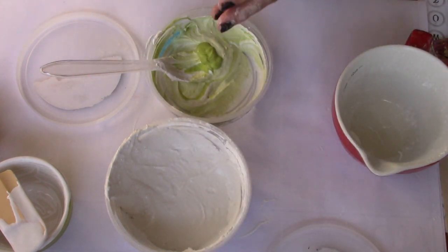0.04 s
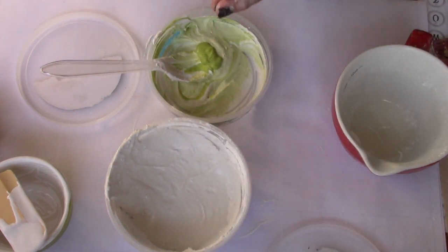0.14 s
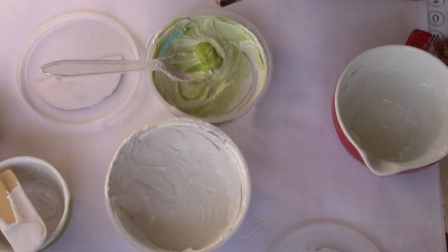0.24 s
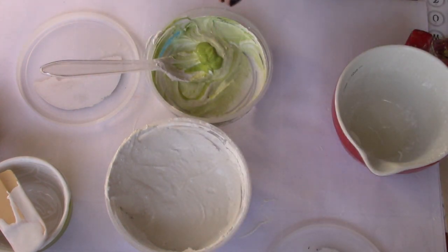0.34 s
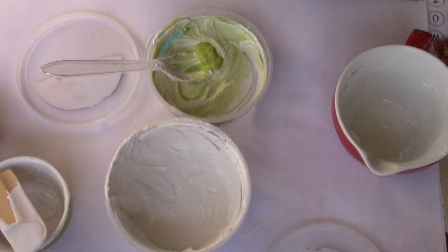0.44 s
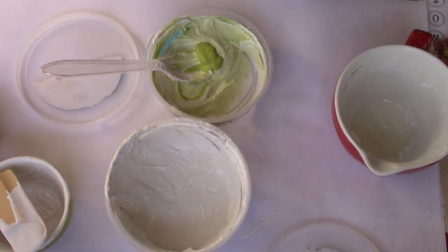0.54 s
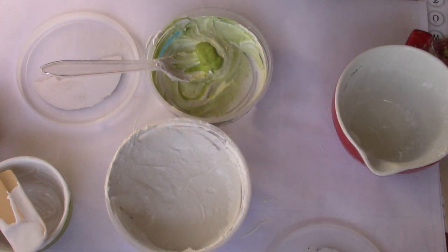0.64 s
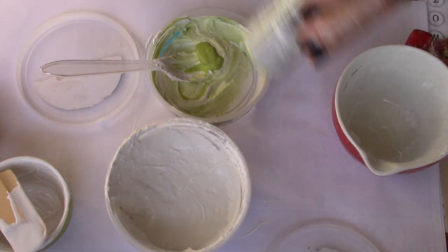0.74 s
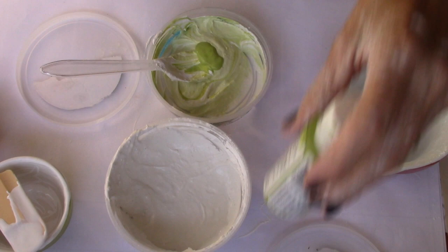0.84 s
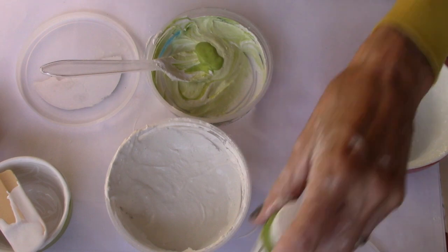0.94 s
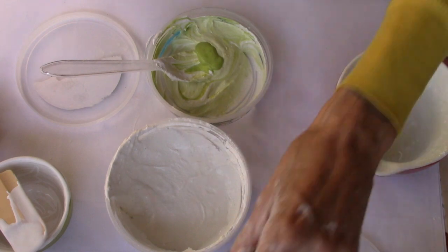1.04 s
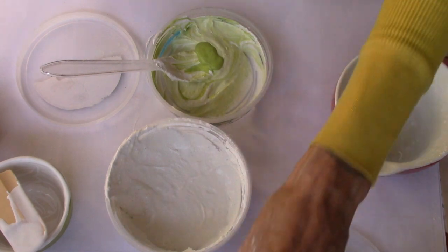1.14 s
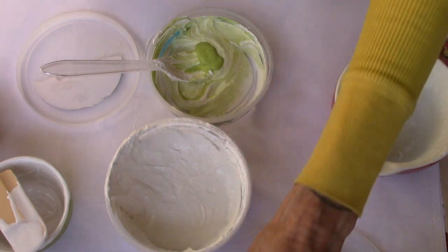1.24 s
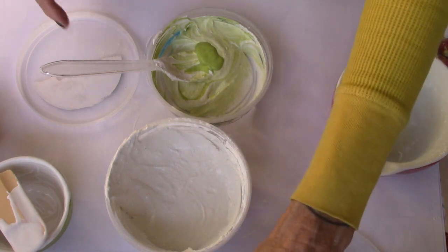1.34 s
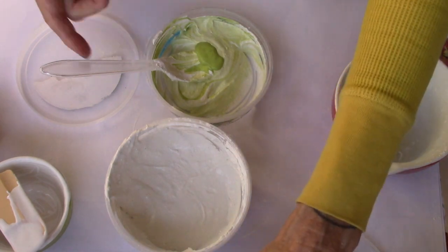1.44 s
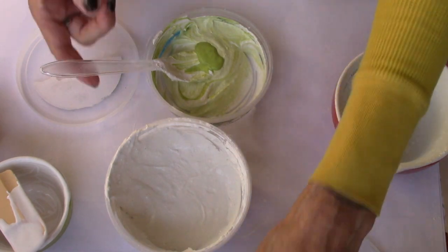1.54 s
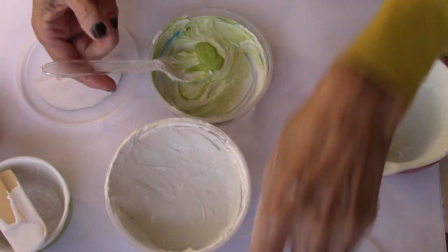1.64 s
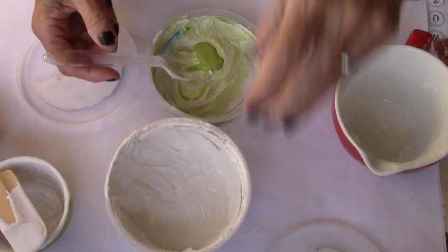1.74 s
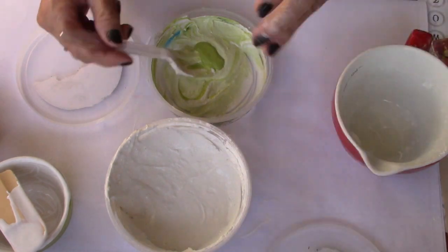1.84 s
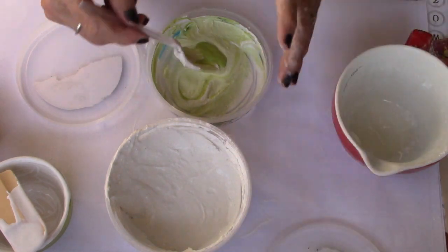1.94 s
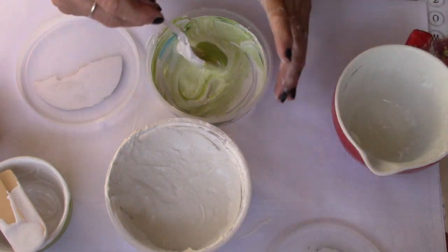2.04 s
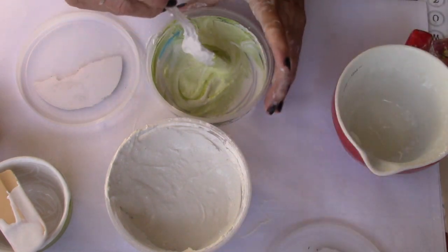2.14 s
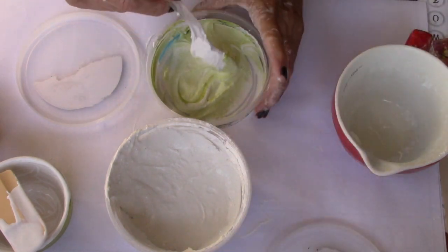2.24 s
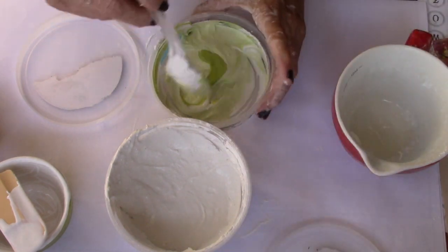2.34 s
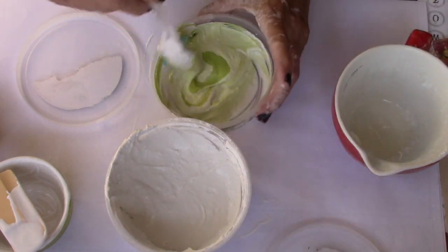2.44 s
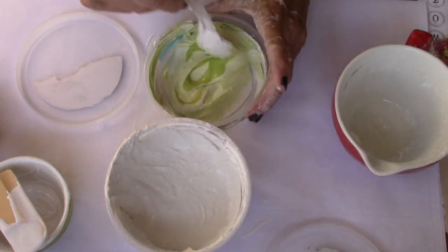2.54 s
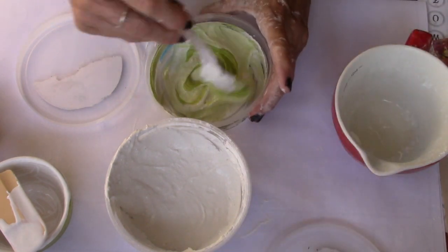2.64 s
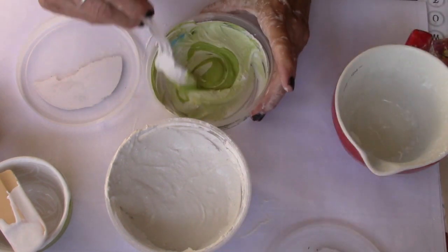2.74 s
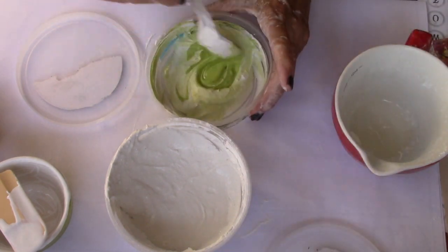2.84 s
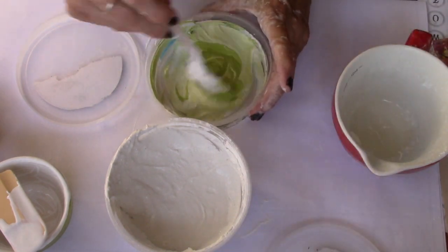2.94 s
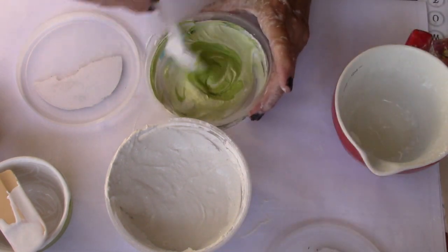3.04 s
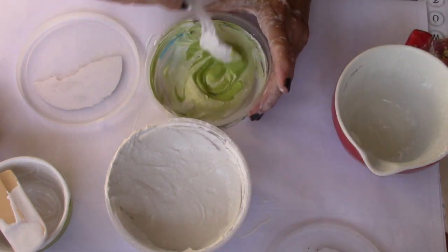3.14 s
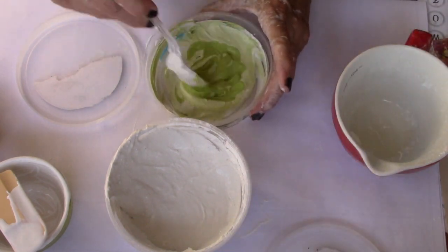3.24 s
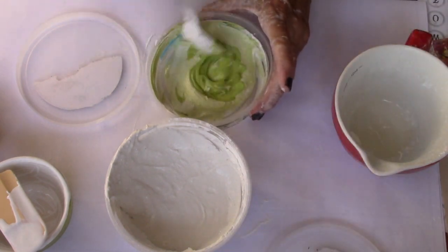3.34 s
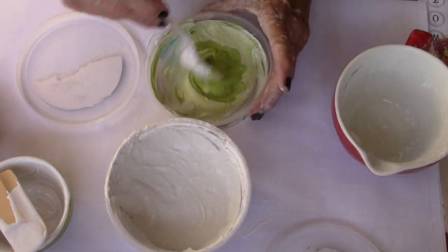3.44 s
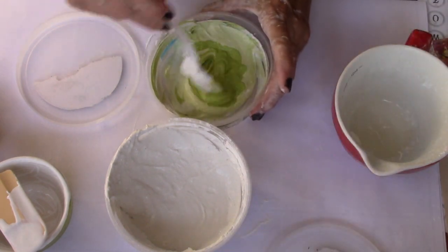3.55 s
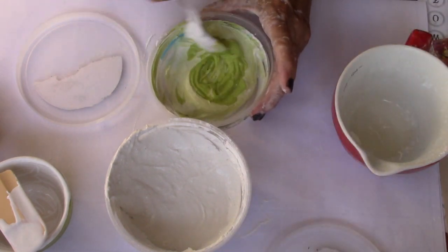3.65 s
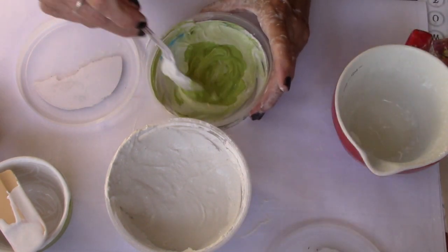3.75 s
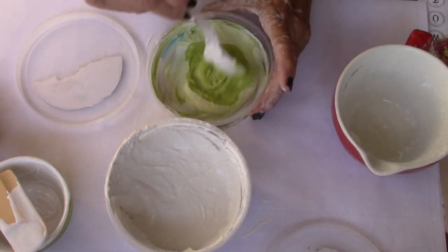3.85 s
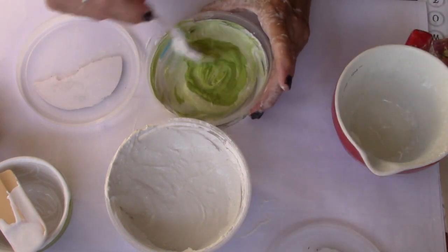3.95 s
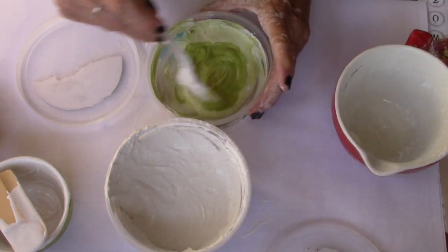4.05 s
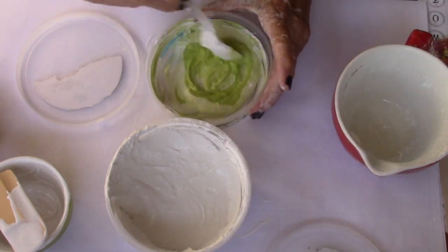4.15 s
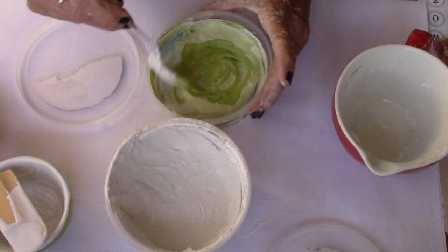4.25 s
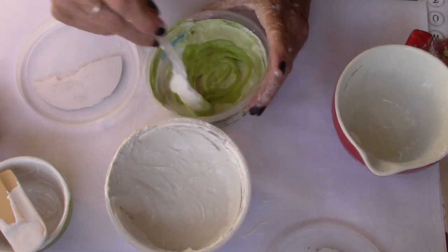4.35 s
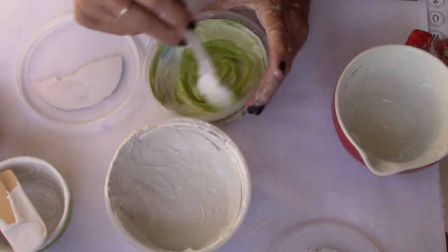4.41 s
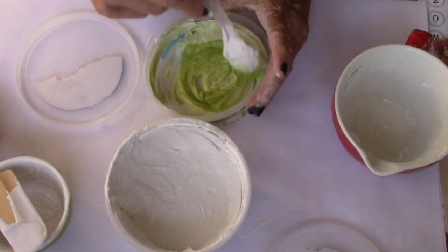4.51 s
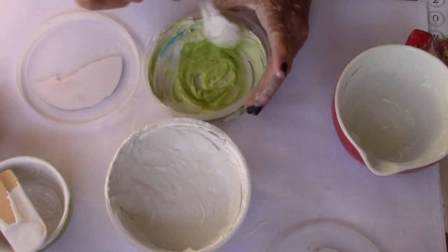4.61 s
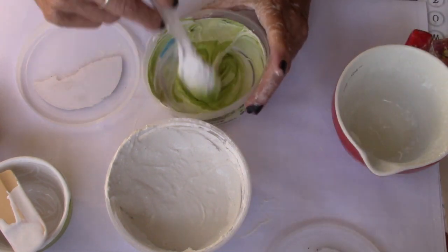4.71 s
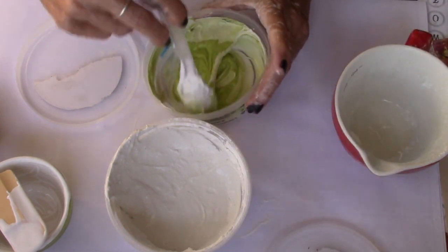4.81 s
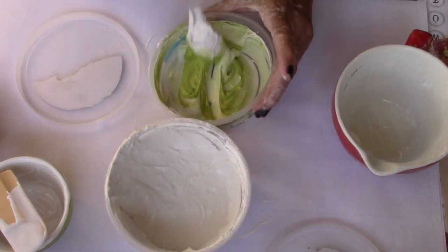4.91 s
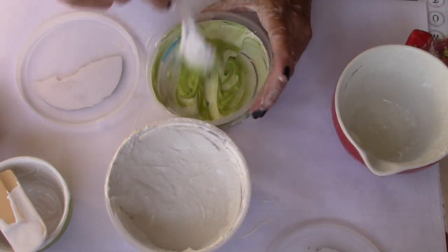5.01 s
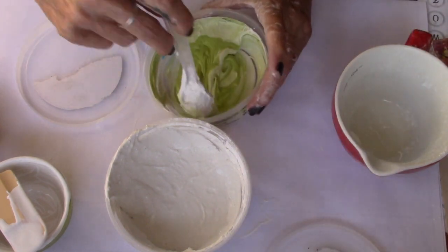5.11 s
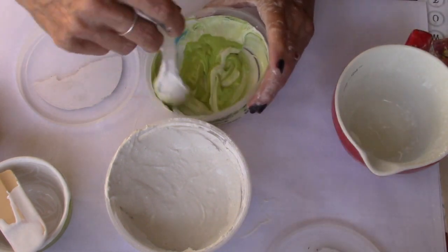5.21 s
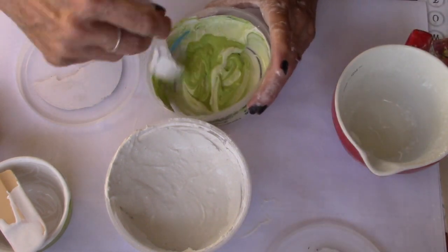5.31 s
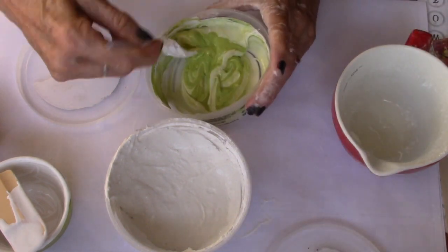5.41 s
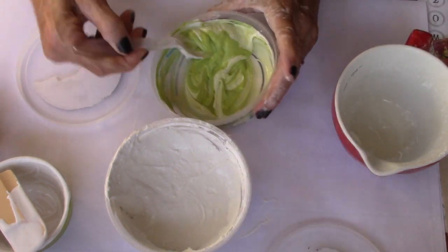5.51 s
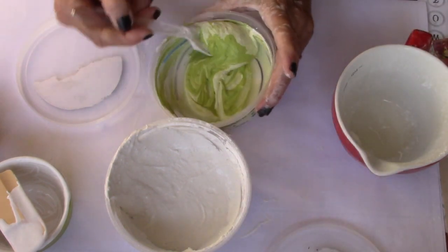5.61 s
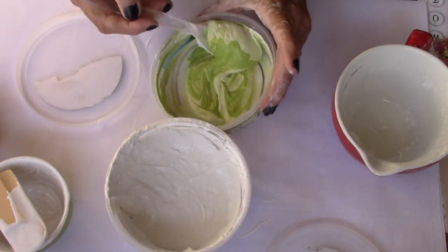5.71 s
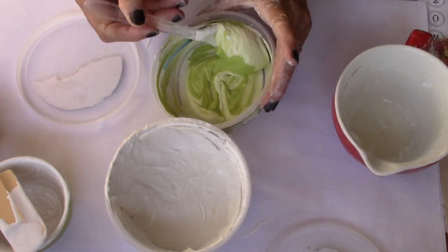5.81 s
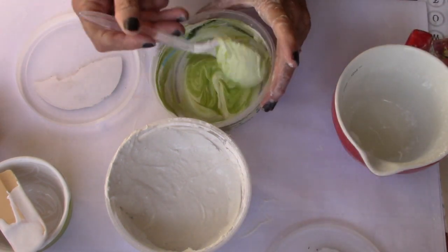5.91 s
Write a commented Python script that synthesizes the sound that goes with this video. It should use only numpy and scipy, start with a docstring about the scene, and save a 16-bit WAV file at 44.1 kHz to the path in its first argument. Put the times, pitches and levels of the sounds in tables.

```python
"""Stirring thick paste on a hollow table

A bottle is handled, then set down with a loud knock; later a plastic spoon stirs paste in a small plastic tub.
Strokes and rumbling arms are friction noise through resonances and filters; knocks, ticks and blows are
decaying modes with noise bursts. The sounds on the table get a short stereo reverberation, over a quiet room tone.
"""
import sys
import numpy as np
from scipy import signal
from scipy.fft import rfft, irfft, next_fast_len
from scipy.io import wavfile
from scipy.ndimage import uniform_filter1d, map_coordinates

SR = 44100
rng = np.random.default_rng(int(sys.argv[2]) if len(sys.argv) > 2 else 0)


def log_audio(samples):
    """Write samples as a 16-bit WAV file to the path given in sys.argv[1]."""
    # one column per channel
    frames = np.atleast_2d(samples).T
    # limit to full scale, then quantise
    limited = np.clip(frames, -1, 1)
    pcm = np.round(limited * 32767).astype(np.int16)
    wavfile.write(sys.argv[1], SR, pcm)


N = 263347  # length in samples


def amp(db):
    """Gain of a level in dB."""
    return 10 ** (np.asarray(db) / 20)


def unit(x):
    """Scaled to rms 1."""
    return x / np.sqrt(np.mean(x ** 2) + 1e-20)


def along(points, hz):
    """Reads a curve of (Hz, value) points on a log frequency axis."""
    f, v = np.transpose(points)
    return np.interp(np.log(hz + 1), np.log(f + 1), v)


def curves(rows):
    """One value per sample for each column after the time."""
    s, *cols = np.transpose(rows)
    return [np.interp(np.arange(N) / SR, s, c) for c in cols]


def wobble(rate):
    """A smooth random curve, rate knots a second."""
    knots = rng.standard_normal(int(N * rate / SR) + 4)
    return map_coordinates(knots, [np.arange(N) * rate / SR])


def filtered(x, response):
    """Multiplies the spectrum of x by a response of frequency."""
    m = next_fast_len(N + SR // 2)
    spectrum = rfft(x, m) * response(np.fft.rfftfreq(m, 1 / SR))
    return irfft(spectrum, m)[..., :N]


def shaped(x, points):
    """Colours x with an equalizer curve of (Hz, dB) points."""
    return filtered(x, lambda hz: amp(along(points, hz)))


def ringing(modes, seconds, spread_db=0, opposite=True):
    """Decaying sines of (Hz, dB, t60 s), neighbours in opposite phase or all in step, largest swing 1."""
    t = np.arange(round(seconds * SR)) / SR
    ring = np.zeros(len(t))
    for k, (hz, db, t60) in enumerate(modes):
        sign = (-1) ** (k * opposite)
        decay = amp(db + spread_db * rng.standard_normal() - 60 * t / t60)
        ring += sign * decay * np.sin(2 * np.pi * hz * t)
    ring *= 1 - np.exp(-t / 0.00014)  # no contact is instant
    return ring / np.abs(ring).max()


def add(track, s, sound):
    """Mixes a sound in at s seconds."""
    part = track[round(s * SR):][:len(sound)]
    part += sound[:len(part)]


def grit(grain_db, clump_db):
    """Friction noise: tiny slips of uneven size, in clumps."""
    sizes = amp(grain_db * wobble(900) + clump_db * wobble(70))
    return unit(sizes * rng.standard_normal(N))


def patchy(x, depth_db):
    """Narrow bands come and go, as small parts of the plastic ring for a moment."""
    z = signal.stft(x, nperseg=256)[2]
    across_bands = uniform_filter1d(rng.standard_normal(z.shape), size=3, axis=0)
    field = uniform_filter1d(across_bands, size=12, axis=1)
    return unit(signal.istft(z * amp(depth_db * unit(field)), nperseg=256)[1][:N])


# colour of the air noise: pitch_hz, density_db [relative, per Hz]
AIR_COLOUR = [(12, -48), (20, -17), (60, -8), (123, -4.5), (177, 1.5), (270, 3), (849, -3), (1000, -3),
              (1860, -13), (5680, -23), (11400, -21), (14700, -28.5), (16000, -31)]
# likeness of left and right noise: pitch_hz, likeness [1 = the same]
STEREO_LIKENESS = [(60, 0.11), (180, 0.52), (550, 0.38), (1650, 0.31), (4970, 1), (15000, 1.0)]


def room_tone():
    """Air noise with a slightly drifting level, partly different at the two microphones."""
    def mid_side_gains(hz):
        turn = np.arccos(np.clip(along(STEREO_LIKENESS, hz), -1, 1)) / 2
        return amp(along(AIR_COLOUR, hz)) * [np.cos(turn), np.sin(turn)]

    mid, side = filtered(rng.standard_normal((2, N)), mid_side_gains)
    level_db = -60 + 0.3 * wobble(3.8)
    return amp(level_db) * unit(np.array([mid + side, mid - side]))


# sleeves and hands on the table, levels gliding between rows: time_s, rumble_db, cloth_db
ARM_LEVELS = [(0.0, -66.5, -65), (1.63, -56.5, -61.5), (2.28, -63, -62), (4.34, -65, -64.5),
              (5.62, -64, -58), (5.97, -68, -61)]
# modes of the hollow table top: pitch_hz, level_db [relative], t60_s
TOP_MODES = [(177, -34.5, 0.25), (198.8, -17, 0.255), (255.2, -12, 0.2), (319, -6, 0.16),
             (372.4, -5.5, 0.09), (402, -5.5, 0.1), (489, -11, 0.2), (546.5, -9.5, 0.21),
             (583.6, -13, 0.19), (674, -12, 0.16), (721, -14, 0.1), (753.4, -14.5, 0.2), (832, -22, 0.098),
             (888, -28.5, 0.25)]
# lowest bending of the top: pitch_hz, t60_s
BOOM_HZ, BOOM_T60_S = (118, 0.3)
# colour of the dull rustle on the top: pitch_hz, density_db [relative, per Hz]
CLOTH_COLOUR = [(500, -9), (1200, 5), (3000, -2.5), (6500, -8.5), (8500, -16), (11000, -66)]


def arms():
    """Sleeves drag on the top: friction makes its modes rumble and the cloth rustles."""
    rumble_db, cloth_db = curves(ARM_LEVELS)
    top = ringing(TOP_MODES + [(BOOM_HZ, -8, BOOM_T60_S)], seconds=.3)
    damped = top * amp(-60 * np.arange(len(top)) / SR / 0.11)  # the resting arms shorten the ring
    rumble = unit(signal.fftconvolve(grit(grain_db=1.5, clump_db=4.0), damped)[:N])
    cloth = unit(shaped(grit(grain_db=1.56, clump_db=1.7), CLOTH_COLOUR))
    return amp(rumble_db) * rumble + amp(cloth_db) * cloth


# rubs on plastic, first of fingers and bottle, from 2.1 s of the spoon:
#   most_pressure_s, scrape_db, length_ms [10 dB up and 10 dB down], edge_hiss_db, wall_ring_db, rim_ring_db
RUBS = [(0.004, -59.5, 42, -61.5, -78, -79), (0.161, -67, 52, -73, -53, -57.5),
        (0.394, -57.5, 135, -55.5, -86, -63), (0.47, -63, 64, -64, -77, -68),
        (0.605, -67, 32, -67, -66, -76), (0.665, -65, 52, -89, -61, -62), (0.72, -65, 180, -87, -68, -64.5),
        (1.088, -63, 110, -82, -59.5, -60.5), (1.409, -61, 83, -91, -87, -59),
        (1.98, -70, 190, -89, -69, -69.5), (2.19, -62, 55, -58.5, -82, -69),
        (2.224, -53.5, 85, -54, -50.5, -54), (2.339, -56.5, 123, -59, -57, -57.5),
        (2.421, -55, 64, -66, -73, -57), (2.486, -47.5, 106, -52.5, -49.5, -51.5),
        (2.66, -64.5, 81, -64, -59, -61), (2.715, -65, 88, -65, -69, -79), (2.81, -79, 67, -82, -60, -62),
        (2.851, -58, 52, -61.5, -61, -63), (2.936, -61.5, 38, -65, -57.5, -53),
        (3.059, -73, 84, -68, -80, -63), (3.101, -67, 55, -73, -75, -74),
        (3.189, -64.5, 145, -65.5, -65, -65.5), (3.35, -66, 124, -71, -76, -62),
        (3.467, -64, 79, -70, -64, -62.5), (3.58, -61, 89, -62.5, -64, -61),
        (3.747, -69, 230, -72, -82, -69), (3.849, -63.5, 72, -67, -66, -65),
        (3.967, -59.5, 86, -63.5, -60, -62.5), (4.093, -54.5, 63, -62.5, -71, -55),
        (4.349, -53, 47, -61, -45, -50), (4.472, -58, 107, -61.5, -76, -57.5),
        (4.612, -58.5, 130, -56.5, -55.5, -59.5), (4.86, -54.5, 98, -59.5, -48, -52),
        (4.975, -65, 73, -67, -68, -73), (5.108, -61.5, 130, -65, -57.5, -60.5),
        (5.21, -66, 85, -69, -55.5, -66), (5.304, -57.5, 108, -57, -66, -52.5),
        (5.374, -54, 26, -58, -78, -43), (5.44, -57, 50, -66, -61, -55),
        (5.526, -53.5, 94, -54, -47.5, -46.5), (5.574, -62, 120, -71, -55, -50.5),
        (5.721, -53, 130, -58.5, -55, -50), (5.78, -69, 94, -61.5, -54.5, -72),
        (5.85, -67, 130, -68, -65, -64)]
# the place that is rubbed sets the pitch, before scatter: time_s, wall_hz, rim_hz
RUBBED_PLACE = [(0.0, 1210, 3340), (0.4, 1180, 3470), (0.65, 1310, 2360), (1.09, 850, 3200),
                (1.4, 900, 2520), (2.2, 1094, 2910), (2.66, 1077, 2430), (4.1, 1050, 2590),
                (4.35, 1400, 1970), (4.55, 1140, 2600), (4.86, 1390, 2650), (5.44, 1220, 2680),
                (5.52, 1650, 2000), (5.58, 1250, 2520), (5.72, 1240, 2060), (5.8, 1060, 2100),
                (5.97, 1260, 2200)]
# colour of the scrape: pitch_hz, density_db [relative, per Hz]
SCRAPE_COLOUR = [(1000, -82), (2500, -4), (3500, 1), (4700, 4.5), (5700, 7), (7000, -3), (9000, -19),
                 (12000, -30)]
# colour of the edge hiss: pitch_hz, density_db [relative, per Hz]
EDGE_COLOUR = [(6000, -19), (8000, 0.5), (10500, 0.5), (12000, -2.5), (14000, -9), (16000, -13)]
RISE_SHARE = 0.41  # share of a stroke's length spent rising 10 dB
PITCH_SCATTER = .03  # relative; no two strokes touch quite the same place


def sing(slips, modes):
    """Slips keep short modes ringing, at rms 1."""
    return unit(signal.fftconvolve(slips, ringing(modes, seconds=.05))[:len(slips)])


def plastic_strokes():
    """Each stroke slips along plastic: it hisses, and wall and rim sing where they are touched."""
    slips = grit(grain_db=2, clump_db=1.8)
    scrape = patchy(shaped(slips, SCRAPE_COLOUR), depth_db=2.5)
    edge = patchy(shaped(slips, EDGE_COLOUR), depth_db=2.5)
    sound, t = np.zeros(N), np.arange(N) / SR
    walls_hz, rims_hz = curves(RUBBED_PLACE)
    scatter = 1 + PITCH_SCATTER * rng.standard_normal((len(RUBS), 2))
    for (s, db, ms, edge_db, wall_db, rim_db), (wall_off, rim_off) in zip(RUBS, scatter):
        rise, fall = max(ms, 10) / 1000 * np.array([RISE_SHARE, 1 - RISE_SHARE])
        span = slice(max(round((s - 3 * rise) * SR), 0), round((s + 3 * fall) * SR))
        peak = round(abs(s) * SR)
        wall_hz, rim_hz = wall_off * walls_hz[peak], rim_off * rims_hz[peak]
        wall = sing(slips[span], [(wall_hz, 0, .02), (wall_hz * 1.315, -1.5, .012), (wall_hz * 0.867, -4, .012)])
        rim = sing(slips[span], [(rim_hz, 0, .009), (rim_hz * 1.242, 0, .009), (rim_hz * 0.81, 0, .009)])
        away = np.where(t[span] < s, (s - t[span]) / rise, (t[span] - s) / fall)
        pressure = amp(-10 * away ** 1.33)
        hiss = amp(db) * scrape[span] + amp(edge_db) * edge[span]
        song = amp(wall_db) * wall + amp(rim_db) * rim
        sound[span] += pressure * (hiss + song)
    return sound


# knocks of tub and bottle: start_s, knock_db, pitch_hz, wall_ring_db
HOLLOW_KNOCKS = [(0.1527, -35.5, 369, -42), (0.2073, -52, 293, -54), (0.749, -54, 400, -47),
                 (1.581, -47, 485, -47.5), (2.4167, -32, 712, -49), (3.0927, -58, 361, -44.5),
                 (3.181, -50, 456, -45), (3.46, -65, 237, -45), (4.0036, -63, 662, -40.5),
                 (4.3425, -28.5, 272, -27.5), (4.405, -48, 273, -60), (4.789, -35.5, 390, -37),
                 (4.856, -40, 472, -49), (5.1433, -44.5, 368, -43.5), (5.1592, -44.5, 240, -48),
                 (5.2831, -41, 278, -39.5), (5.4487, -47.5, 280, -48)]
# modes of the tub wall: pitch_hz, level_db [relative, before random spread], t60_s
WALL_MODES = [(957, 4.5, 0.012), (1098, 8.5, 0.032), (1324, 2, 0.043), (1580, 5, 0.029)]


def knocks():
    """A hollow knock of three decaying modes against the table; the wall rings along."""
    sound = np.zeros(N)
    for s, db, hz, wall_db in HOLLOW_KNOCKS:
        hollow = ringing([(hz, 0, 22 / hz), (hz * 1.62, -6, .03), (hz * 2.36, -6, .015)], seconds=.2)
        add(sound, s, amp(db) * hollow)
        add(sound, s, amp(wall_db) * ringing(WALL_MODES, seconds=.1, spread_db=5.5))
    return sound


# ticks of spoon and bottle: start_s, click_db, pitch_hz, snap_db [before colouring]
SMALL_TICKS = [(0.1528, -31.5, 3410, -34.5), (0.3336, -44, 5900, -43), (0.648, -38, 2400, -46),
               (0.7918, -43, 3050, -44), (1.581, -43, 2600, -65), (2.1758, -47, 5680, -34),
               (2.4165, -30.5, 2380, -53), (2.4954, -33.5, 3050, -32), (2.6593, -41, 2270, -48),
               (2.9153, -46, 2500, -51), (2.9855, -56, 3220, -39), (3.0926, -45, 2640, -41),
               (3.1818, -43, 2560, -54), (3.3388, -41.5, 2490, -44), (3.3606, -43, 2650, -29),
               (3.46, -31, 4850, -35.5), (3.9693, -33, 4950, -50), (4.0036, -47, 2900, -58),
               (4.057, -32, 2700, -37), (4.0747, -43, 5000, -50), (4.1064, -49, 4940, -42),
               (4.1162, -37, 4600, -45), (4.1698, -64, 2340, -40.5), (4.329, -42, 4280, -37),
               (4.3425, -34, 2150, -50), (4.554, -46, 2230, -47), (4.789, -38, 2700, -45),
               (4.8065, -44, 2680, -36), (4.8421, -49, 2760, -40), (4.8904, -39, 5810, -23.5),
               (5.1592, -46, 2500, -36), (5.2836, -42, 2840, -52), (5.2948, -38, 2400, -45),
               (5.3722, -36, 2120, -35), (5.4494, -40, 2880, -33.5), (5.5178, -31, 2410, -16)]
# colour of the bright part of a tick: pitch_hz, gain_db
SNAP_COLOUR = [(1500, -17), (4000, -5.5), (8000, -1.5), (10500, -1), (13500, -4), (16000, -13)]
TICK_WALL_DB = -11.5  # ring of the tub wall, relative to the click


def ticks():
    """Each small contact: a short pitched click, a bright noise snap and a ring of the wall."""
    sound, snaps, t = np.zeros(N), np.zeros(N), np.arange(SR // 50) / SR
    snap_decay = amp(-60 * t / 0.0016) + amp(-12 - 60 * t / 0.021)  # sharp start, softer tail
    for s, db, hz, snap_db in SMALL_TICKS:
        modes = [(hz, 0, .009), (hz * 1.45, -3, .004), (hz * 0.7, -6, .005)]
        add(sound, s, amp(db) * ringing(modes, seconds=.03, spread_db=3.5))
        add(snaps, s, amp(snap_db) * snap_decay * rng.standard_normal(len(t)))
        add(sound, s, amp(db + TICK_WALL_DB) * ringing(WALL_MODES, seconds=.1, spread_db=2))
    return sound + shaped(snaps, SNAP_COLOUR)


# blows on the table: start_s, level_db [before contact smoothing], contact_ms, boom_db [relative to level]
TABLE_BLOWS = [(0.541, -45, .8, -25), (0.653, -27, 2.2, -19), (0.749, -45, .8, -14), (1.084, -46, .8, -27),
               (1.348, 0, .8, -44), (1.58, -35, .8, -26), (1.6, -35, 2.2, -10), (1.927, -40, 2.2, -6),
               (1.959, -39, 2.2, -5)]
# colour of the many close, damped modes of the top: pitch_hz, density_db [relative, per Hz]
THUD_COLOUR = [(40, -55), (100, -22), (170, -8), (350, 4.5), (700, -4), (1000, -24), (1600, -56)]
# the bottle lands: start_s, peak_db
LANDING_S, LANDING_DB = (1.3486, -19)
# modes of the bottle base: pitch_hz, level_db [relative], t60_s
BOTTLE_MODES = [(400.5, -8, 0.073), (1177, -11.5, .05), (1440, -17, 0.025), (1820, -23.5, 0.039),
                (2300, -19, 0.035), (3000, -30, 0.023), (5600, -37, .02)]
TOP_RISE_S, BOOM_RISE_S = .0007, 0.015  # the top takes a moment to swing out
TOP_LOW_HZ = 170  # high-pass of the ringing top; the boom is added separately


def table():
    """Blows ring the hollow top; a longer contact pushes more softly and loses the high modes."""
    sound, t = np.zeros(N), np.arange(SR // 2) / SR
    dense = unit(shaped(rng.standard_normal(N), THUD_COLOUR))
    top = ringing(TOP_MODES, seconds=.5, opposite=False) * (1 - np.exp(-t / TOP_RISE_S))
    top = signal.sosfilt(signal.butter(N=4, Wn=TOP_LOW_HZ, btype='high', fs=SR, output='sos'), top)
    boom = ringing([(BOOM_HZ, 0, BOOM_T60_S)], seconds=.5) * (1 - np.exp(-t / BOOM_RISE_S))
    for s, db, ms, boom_db in TABLE_BLOWS:
        push = np.hanning(max(int(ms * SR / 1000), 3) + 2)
        add(sound, s, amp(db) * np.convolve(top + amp(boom_db) * boom, push / push.sum()))
        swell = amp(db - 19 - 60 * t / 0.25) * (1 - np.exp(-t / 0.0029))
        add(sound, s, swell * dense[round(s * SR):][:len(t)])
    add(sound, LANDING_S, amp(LANDING_DB) * ringing(BOTTLE_MODES, seconds=.1))
    # the bottle's thin base chatters as it settles
    rattle = unit(shaped(rng.standard_normal(N), CLOTH_COLOUR))[:len(t)]
    add(sound, LANDING_S, amp(LANDING_DB - 22 - 60 * t / 0.07) * rattle)
    return sound


# reverberation time: pitch_hz, t60_s
ROOM_DECAY = [(150, 0.24), (1000, 0.35), (4000, 0.1), (12000, 0.14)]
# left-right difference in the reverberation: pitch_hz, side_db [relative to mid]
ROOM_WIDTH = [(200, -25), (1500, -24), (4000, -44), (12000, -34)]


def room(x):
    """Noise tail whose bands die at their own speeds; the close microphones hear nearly the same tail."""
    hz, t, z = signal.stft(rng.standard_normal((2, SR // 2)), SR, nperseg=256)
    z[1] *= amp(along(ROOM_WIDTH, hz))[:, None]
    decay = amp(-60 * t / along(ROOM_DECAY, hz)[:, None])
    mid, side = signal.istft(z * decay, SR, nperseg=256)[1]
    tail = np.array([mid + side, mid - side]) / np.linalg.norm(mid)
    delayed = np.pad(x, (300, 0))  # samples before the tail starts
    return signal.fftconvolve(delayed[None], tail, axes=1)[:, :N]


BASS_HZ = 80  # corner of the microphone's high-pass


def scene():
    """Everything on the table, its reverberation and the room tone."""
    near = plastic_strokes() + ticks() + knocks() + table() + arms()
    # the microphone's high-pass thins the bass
    thin = filtered(near, lambda hz: (1j * hz / (BASS_HZ + 1j * hz)) ** 2)
    return thin + amp(-13.5) * room(thin) + room_tone()


TOP_HZ = 15800  # upper band limit


def record(dry):
    """A sharp cut leaves nothing above the band limit."""
    return filtered(dry, lambda hz: hz < TOP_HZ)


dry = scene()
out = record(dry)
log_audio(out)
```